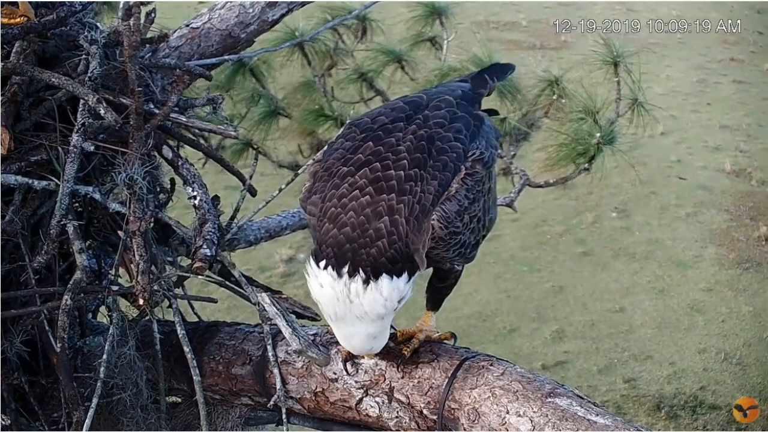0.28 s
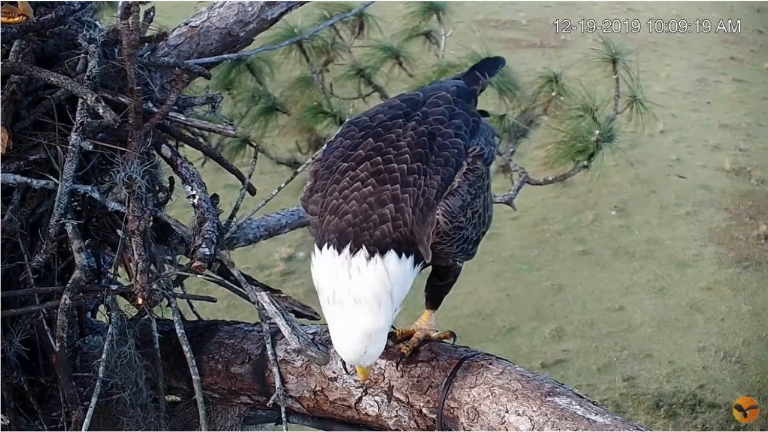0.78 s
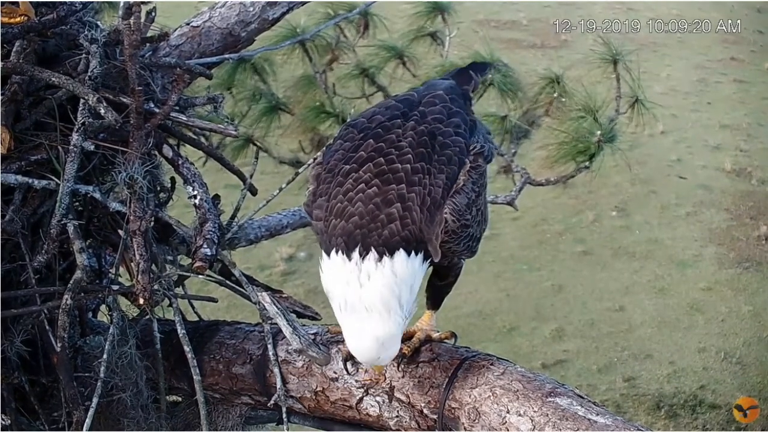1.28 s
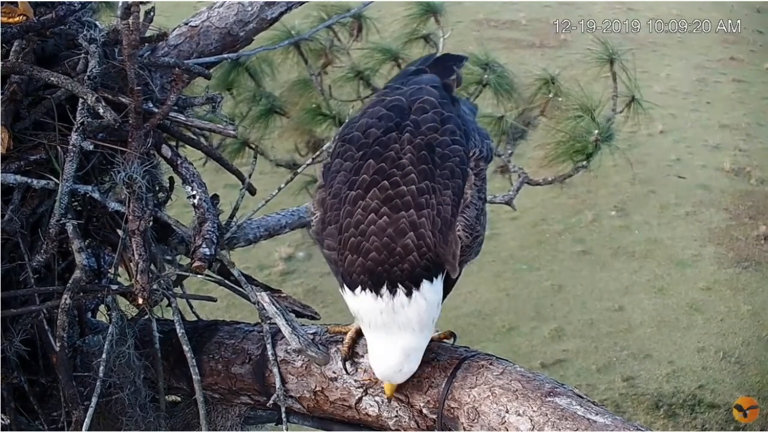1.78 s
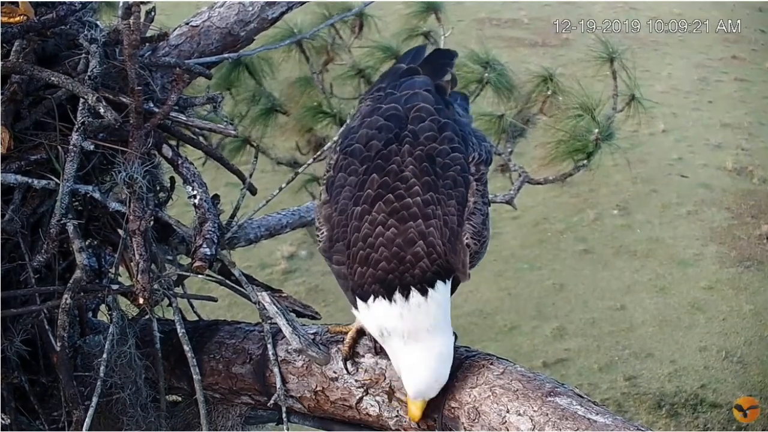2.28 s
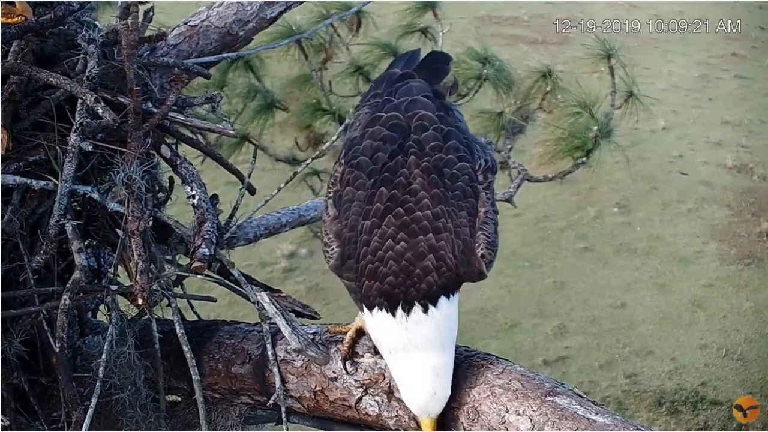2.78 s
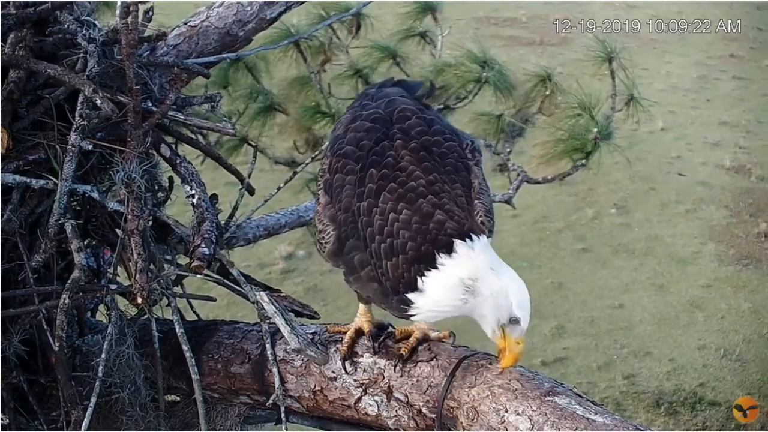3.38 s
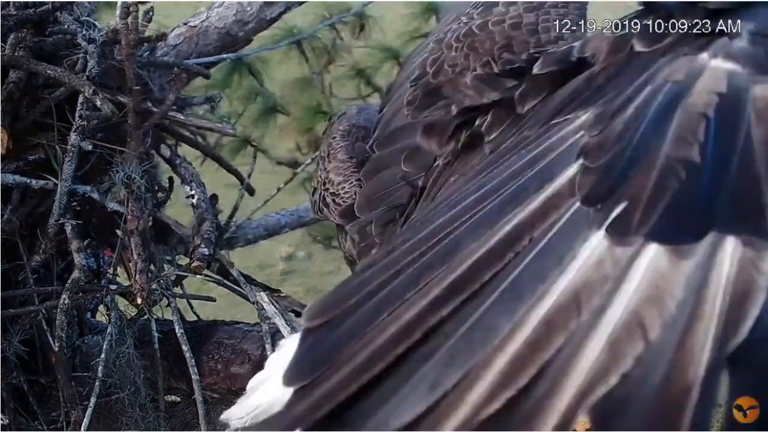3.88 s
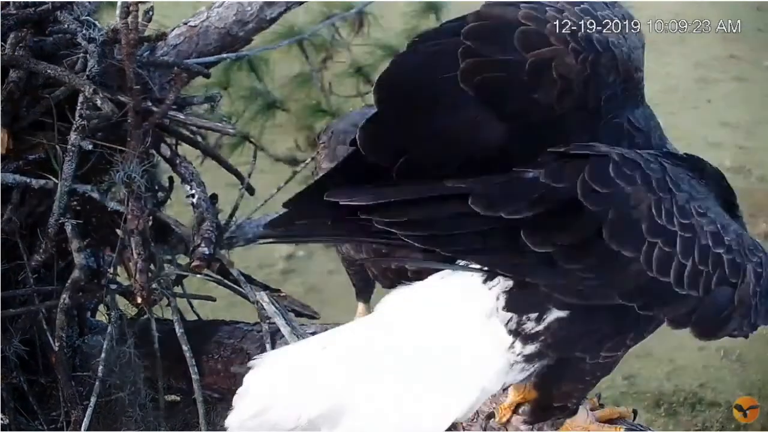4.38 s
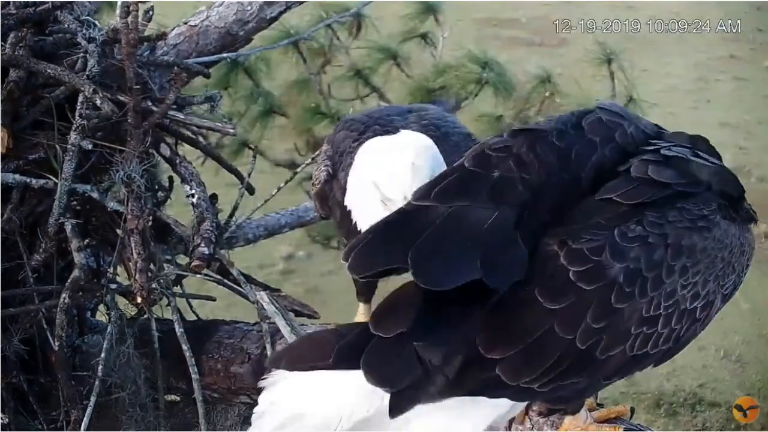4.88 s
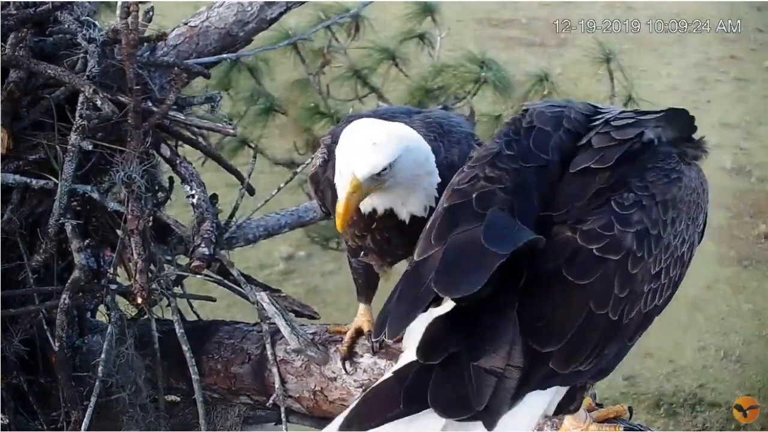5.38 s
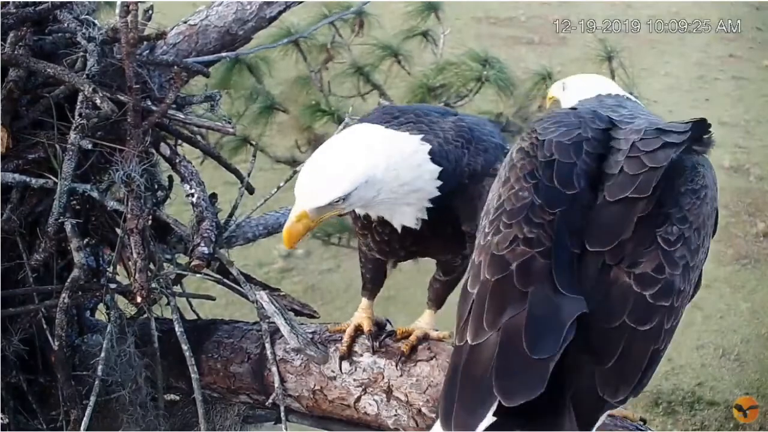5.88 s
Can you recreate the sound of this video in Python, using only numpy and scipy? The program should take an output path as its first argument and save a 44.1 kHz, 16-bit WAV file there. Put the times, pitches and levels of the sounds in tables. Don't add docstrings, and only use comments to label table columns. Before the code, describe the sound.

Throughout, gusting low wind rumble, a muffled hum of far tyres and thin hiss lie under two eagles at a nest, heard close, nearly mono. Faint peeps and ticks come at 0.2-0.3 s. At 0.9 s a clear high whistle bends up and falls, with a weaker rising end until 1.06. Around 1.53-1.65 a broken lower waver becomes a strong rising cry. A high wavering whistle follows at 2.3-2.5, then a loud, piercing low waver at 3.06-3.23. Two very short cries jab at 3.56 and 3.69, the second jittery. Small peeps and claw or twig ticks fill the pause. The mate gives a low chirp and chuck at 4.7, quick chitters at 5.12-5.27, a chuck at 5.68 and more chirps from 5.8. High whistles arch and rise over these from 5.87 to 6.04; a faint chuck ends near 6.13. Trees return a short echo.

```python
import sys
import numpy as np
from scipy import signal
from scipy.io import wavfile
from scipy.ndimage import uniform_filter1d

SR = 44100
rng = np.random.default_rng(int(sys.argv[2]) if len(sys.argv) > 2 else 0)


def store_wav(level_fs):
    pcm = np.round(np.clip(np.atleast_2d(level_fs), -1, 1) * 32767)
    wavfile.write(sys.argv[1], SR, pcm.T.astype(np.int16))


def ratio_of_db(decibels):
    return 10 ** (np.asarray(decibels, float) / 20)


N = 272097


def eagles():
    return low_whistles() + high_whistles() + mate_chirps() + peeps()


def low_whistles():
    # [start_s, pitch_hz, effort_db]
    wavers = [
        [(1.527, 2630, -46), (1.535, 2557, -32.5), (1.551, 2752, -23), (1.565, 2758, -23), (1.573, 2872, -40),
         (1.585, 2940, -32), (1.591, 2675, -39.5), (1.598, 2655, -36)],
        [(1.593, 2650, -40.5), (1.611, 2770, -12), (1.633, 2843, -11.5), (1.648, 2925, -29)],
    ]
    # [start_s, pitch_hz, effort_db]
    long_waver = [
        [(3.057, 2900, -39.5), (3.066, 2685, -16), (3.074, 2770, -10), (3.088, 2790, -11), (3.1, 2864, -9),
         (3.118, 2850, -10), (3.138, 2740, -10), (3.15, 2727, -11.5)],
        [(3.1455, 2714, -12.5), (3.16, 2743, -11), (3.172, 2785, -8.5), (3.187, 2890, -9.5), (3.205, 2890, -9),
         (3.216, 2846, -10), (3.225, 2890, -29.5)],
    ]
    # [start_s, pitch_hz, effort_db]
    short_cries = [
        [(3.557, 2750, -41), (3.568, 2837, -25.5), (3.578, 2893, -22.5), (3.583, 2958, -12), (3.592, 2927, -12),
         (3.6, 2940, -26)],
        [(3.685, 2760, -41), (3.691, 2755, -20), (3.694, 2680, -12), (3.698, 2660, -20), (3.703, 2870, -12),
         (3.71, 2802, -12.5), (3.717, 2730, -35)],
    ]
    # [start_s, length_s, level_db]
    high_breaks = [
        (1.583, 0.043, -43.5),
        (3.055, .02, -43),
        (3.559, 0.043, -44.5),
        (3.68, 0.019, -44),
    ]
    return whistles(wavers + long_waver + short_cries, high_breaks,
                    overtone_db=-7.0, growth=2.01, strong=2.993,
                    partials_db={2: -20.0, 4: -12.0, 5: -25.0}, squared_db=-19,
                    other_hz=3570, width_hz=500, flutter_db=-27.0, knee=0.33, ceiling=0.57)


def high_whistles():
    # [start_s, pitch_hz, effort_db]
    calls = [
        [(0.9, 3670, -38), (0.906, 3446, -34), (0.918, 3576, -24), (0.934, 3690, -17.5), (0.966, 3645, -18.5),
         (1.002, 3452, -42)],
        [(0.997, 3524, -45), (1.009, 3584, -28), (1.031, 3610, -22), (1.058, 3690, -35)],
        [(2.324, 3710, -50), (2.334, 3622, -21.5), (2.35, 3704, -16.5), (2.406, 3574, -22.5),
         (2.444, 3693, -17), (2.462, 3730, -17), (2.476, 3654, -28.5)],
        [(5.874, 3406, -42.5), (5.884, 3450, -21.5), (5.906, 3557, -16), (5.924, 3598, -17.5),
         (5.944, 3525, -19.5), (5.962, 3355, -35)],
        [(5.957, 3384, -36.5), (5.977, 3377, -26.5), (6.017, 3588, -19.5), (6.027, 3550, -21.5),
         (6.044, 3620, -48.5)],
    ]
    # [start_s, length_s, level_db]
    low_breaks = [
        (.905, 0.025, -42),
        (.93, 0.076, -38),
        (1.02, .035, -38),
        (2.34, .14, -42.5),
        (5.9, 0.11, -57),
        (6.015, 0.015, -34.5),
    ]
    return whistles(calls, low_breaks,
                    overtone_db=-2.5, growth=2.5, strong=2.001, partials_db={3: -36.0}, squared_db=-28.0,
                    other_hz=2880, width_hz=120, flutter_db=-36.0, knee=0.01, ceiling=0.6)


def whistles(tables, breaks, overtone_db, growth, strong, partials_db, squared_db,
             other_hz, width_hz, flutter_db, knee, ceiling):
    phase, (effort,) = controls(tables, tremble_share=0.002)
    strike = 1 + (knee / (effort + 1e-9)) ** 14
    overtone = ratio_of_db(overtone_db) * effort ** growth / strike
    lead = effort / (1 + (effort / ceiling) ** 4) ** (1 / 4)
    out = lead * np.sin(phase) + overtone * np.sin(strong * phase)
    for k, db in partials_db.items():
        out += ratio_of_db(db) * overtone * np.sin(k * phase)
    out += ratio_of_db(squared_db) * lead ** 2 * np.sin(2 * phase)
    other = swells(breaks) * unsteady(other_hz, width_hz)
    mixed = other ** 2 + other * lead * np.exp(1j * phase)
    out += other.real + 0.39 * mixed.real / 2
    air = ratio_of_db(-43.0) * overtone * unsteady(8000, 6000).real
    flutter = ratio_of_db(flutter_db) * overtone * unsteady(1000, 520).real
    return out + air + flutter * np.sin(2 * phase)


def mate_chirps():
    # [start_s, length_s, pitch_hz, level_db, pitch_fall_share]
    bright = [
        (4.694, 0.017, 1723, -37, 0.05),
        (5.116, .021, 1904, -29, 0.02),
        (5.129, 0.025, 1983, -28, 0.05),
        (5.148, 0.021, 1914, -30.5, 0.03),
        (5.237, 0.015, 1863, -31.5, 0),
        (5.251, 0.016, 1880, -32, 0.05),
        (5.798, 0.019, 1948, -32, .07),
        (5.815, 0.018, 2039, -32, 0.11),
        (5.997, .02, 1925, -34, 0.07),
    ]
    # [start_s, length_s, pitch_hz, level_db, pitch_fall_share]
    chucks = [
        (4.707, .037, 1307, -35, .13),
        (5.682, 0.036, 1306, -37.5, .06),
        (6.018, 0.0073, 1215, -33, 0.0475),
        (6.12, 0.014, 1278, -40, 0.146),
    ]
    bright_rows = [syllable(*row, second_db=0.71, third_db=15.2, growth=2.15, shut_db=-14) for row in bright]
    chuck_rows = [syllable(*row, second_db=-2.5, third_db=-2.5, growth=1.09, shut_db=-5.5) for row in chucks]
    out = chirps(bright_rows, fourth_db=-12.5, rasp_db=-19.5)
    return out + chirps(chuck_rows, fourth_db=-29.0, rasp_db=-10.5)


def syllable(s, length, hz, db, fall, second_db, third_db, growth, shut_db):
    crest = np.array([db, db + second_db, growth * db + third_db])
    ends = crest - 7 + np.array([0, 1, 1.5]) * shut_db
    return [
        (s, hz * (1 - 0.015), *ends),
        (s + 0.35 * length, hz, *crest),
        (s + 0.7 * length, hz * (1 - fall / 2), *(crest - 2.5)),
        (s + length, hz * (1 - fall), *ends),
    ]


def chirps(tables, fourth_db, rasp_db):
    phase, partials = controls(tables, tremble_share=0.0044)
    stack = sum(level * np.sin((k + 1) * phase) for k, level in enumerate(partials))
    fourth = ratio_of_db(fourth_db) * partials[2] * np.sin(4 * phase)
    rasp = partials[1] * unsteady(2600, 1485).real * (1 + np.cos(phase))
    return stack + fourth + ratio_of_db(rasp_db) * rasp


def peeps():
    # [start_s, length_s, pitch_hz, level_db]
    short_tones = [(0.2, 0.014, 4030, -46), (0.289, .013, 4350, -50), (0.296, 0.025, 2850, -38.5),
                   (.921, 0.014, 2838, -17), (0.987, .02, 5900, -57.5), (.922, 0.0139, 5680, -53),
                   (1.014, 0.015, 5500, -57.5), (1.711, 0.019, 4150, -43.5), (2.297, 0.015, 2080, -41),
                   (2.316, 0.041, 2830, -25), (2.328, 0.037, 4410, -50.5), (2.397, 0.035, 4445, -58),
                   (3.165, 0.0063, 3130, -25), (3.562, .021, 7670, -47), (4.211, 0.024, 3460, -43),
                   (4.22, 0.022, 2880, -31.5), (4.231, 0.011, 7600, -60), (4.771, 0.0079, 7470, -58),
                   (5.048, 0.012, 7350, -59), (5.356, 0.02, 3380, -34), (5.357, 0.019, 4270, -50),
                   (5.78, 0.0094, 2472, -39), (5.814, 0.017, 3320, -31.5), (5.827, .025, 7540, -68.5),
                   (6, 0.011, 3144, -38), (6.137, 0.023, 3680, -58)]
    out = np.zeros(N)
    for s, length, hz, db in short_tones:
        t = np.arange(0, length, 1 / SR)
        shake = evened(signal.oaconvolve(rng.standard_normal(len(t)), np.hanning(300), "same"))
        tone = np.sin(2 * np.pi * hz * t * (1 - 0.12 * t))
        add(out, s, ratio_of_db(db) * (1 + 0.25 * shake) * np.hanning(len(t)) * tone)
    return out


def controls(tables, tremble_share):
    rows, t = np.concatenate(tables), np.arange(N) / SR
    s, hz = rows[np.argsort(rows[:, 0]), :2].T
    tremble = evened(uniform_filter1d(rng.standard_normal(N), size=120))
    pitch = uniform_filter1d(np.interp(t, s, hz), size=200)
    phase = 2 * np.pi * np.cumsum(pitch * (1 + tremble_share * tremble)) / SR
    levels = np.zeros((rows.shape[1] - 2, N))
    for table in tables:
        s, _, *columns = np.transpose(table)
        span = np.arange(s[0], s[-1], 1 / SR)
        edge = signal.windows.tukey(len(span), min(1, 0.009 * SR / len(span)))
        for level, db in zip(levels, columns):
            add(level, s[0], np.sqrt(2) * edge * ratio_of_db(np.interp(span, s, db)))
    return phase, abs(uniform_filter1d(levels, size=60, axis=1))


def swells(rows):
    out = np.zeros(N)
    for s, length, db in rows:
        add(out, s, np.sqrt(2) * ratio_of_db(db) * signal.windows.tukey(round(length * SR), 0.7))
    return out


def unsteady(hz, width_hz):
    r = np.exp(-np.pi * width_hz / SR)
    noise = rng.standard_normal((N, 2)) @ [1, 1j]
    wander = signal.lfilter([1], [1, -2 * r, r * r], noise)
    return evened(wander) * np.exp(2j * np.pi * hz * np.arange(N) / SR)


def ticks():
    # [peak_s, level_db, centre_hz, half_width_hz, decay_ms]
    crackles = [(.181, -57, 6000, 3500, 3), (0.184, -43, 3160, 700, 60), (0.284, -45, 3340, 700, 23),
                (1.073, -56, 10000, 5000, 1.5), (1.583, -44, 4050, 400, 21), (1.609, -45, 9100, 6030, 5.3),
                (3.522, -48, 9000, 6000, 1.5), (3.526, -52, 9000, 4956, 1.75),
                (3.573, -54.5, 10460, 2480, 3.1), (3.601, -58, 9000, 5007, 3),
                (3.692, -44, 8950, 6040, 2.7), (4.282, -50, 10100, 3000, 2.93),
                (4.412, -58, 7540, 3010, 1.4), (4.689, -49, 3970, 2490, 1.5),
                (5.82, -43.5, 3000, 1190, 5.26), (6.002, -45, 2994, 1176, 7.5),
                (6.122, -45, 2820, 1500, 6.5)]
    out, t = np.zeros(N), np.arange(4000) / SR
    for s, db, hz, width_hz, ms in crackles:
        band = signal.butter(3, [max(hz - width_hz, 300), min(hz + width_hz, 16000)], "band", fs=SR)
        noise = evened(signal.lfilter(*band, rng.standard_normal(len(t))))
        envelope = np.exp(-1000 * t / ms) * np.minimum(4000 * t / ms, 1)
        add(out, s - 0.001, ratio_of_db(db) * noise * envelope)
    return out


def trees(x):
    taps = np.zeros((2, SR // 2))
    slots = np.arange(200, SR // 2 - 22, 22)
    at = slots + rng.integers(0, 22, (2, len(slots)))
    np.put_along_axis(taps, at, rng.choice([-1., 1.], at.shape), 1)
    taps[1] = 0.63 * taps[0] + 1.07 * taps[1]
    hz, t, z = signal.stft(taps, SR, nperseg=256)
    t60 = read([(2000, 0.29), (2800, 0.39), (3600, 0.5), (8500, 0.39), (12000, 0.25)], hz)[:, None]
    dull_db = read([(2000, 8.5), (2800, -5.0), (3600, -3.0), (8500, -4.0), (11000, -13.5),
                    (14000, -18.0)], hz)[:, None]
    trunk_db = 4.3 * np.exp(-((t - 0.09) / 0.0097) ** 2)
    field_db = -280 * np.minimum(hz[:, None] / 8000, 1.2) ** 2 * np.clip(t - 0.105, 0, 0.06)
    tail = signal.istft(z * ratio_of_db(dull_db + trunk_db + field_db - 60 * t / t60), SR, nperseg=256)[1]
    return signal.fftconvolve(x[None], tail / np.linalg.norm(tail[0]), axes=1)[:, :N]


def background():
    # [pitch_hz, density_db]
    wind = [(16, -30.5), (28, -1.5), (43, 3.5), (63, 1.5), (88, -6), (200, -28), (300, -36), (390, -64.5),
            (660, -120)]
    tyres = [(120, -50), (200, -19), (237, -22.5), (344, -15.5), (479, -13.5), (529, -13.5), (694, -8),
             (752, -7), (815, -2.5), (986, 0), (1250, -13), (1950, -25), (2200, -31), (2860, -60.5),
             (4840, -120)]
    hiss = [(1060, -36.5), (1800, -11), (2300, -7), (2550, -13.5), (2760, -4), (2900, -4), (3130, -7.5),
            (3950, -9), (4480, -17.5), (6000, -36), (7800, -57), (13200, -120)]
    self_noise = [(2940, -27), (5000, -5), (6000, -5), (8380, -6.5), (10500, -9.5), (12200, -13),
                  (13400, -12.5), (14200, -21), (14500, -24)]
    # [time_s, level_db]
    gusts = [(0.0, -36.5), (0.38, -33.5), (0.63, -37), (1.27, -31.5), (1.61, -33), (1.87, -33), (2.25, -40),
             (2.82, -42.5), (3.09, -38.5), (3.27, -39.5), (3.64, -33.5), (3.85, -40.5), (4.04, -38),
             (4.81, -35.5), (5.09, -37.5), (6.17, -33)]
    # [time_s, level_db]
    traffic = [
        (0.0, -44),
        (0.31, -42),
        (1.84, -43),
        (3.33, -46),
        (3.68, -44),
        (4.95, -42.5),
        (5.55, -44),
        (6.17, -41.5),
    ]
    t = np.arange(N) / SR
    wind_db = np.interp(t, *np.transpose(gusts))
    tyres_db = np.interp(t, *np.transpose(traffic))
    hiss_db = 0.47 * (wind_db - wind_db.mean()) + 0.71 * (tyres_db - tyres_db.mean())
    out = airborne(wind, wind_db, 2.5, size=8192)
    out += airborne(tyres, tyres_db, 1.15)
    out += airborne(hiss, hiss_db, -54.0, lifted=0.87)
    return out + airborne(self_noise, 0, -73)


def airborne(shape, level_db, trim_db, lifted=0, size=2048):
    # [centre_hz, width_hz, lift_db]
    housing = (2850, 160, 5.6)
    # [pitch_hz, side_minus_mid_db]
    apart = [(60, -75.5), (110, -65), (200, -49), (380, -21), (690, -17), (1280, -18.5), (2350, -28),
             (4330, -25.5), (7990, -18), (14700, -7.5)]
    frames, hz = 4 * N // size + 5, np.fft.rfftfreq(size, 1 / SR)
    centre_hz, width_hz, lift_db = housing
    cavity_db = lift_db / (1 + (2 * (hz - centre_hz) / width_hz) ** 2)
    shape_db = read(shape, hz) + lifted * cavity_db
    a, b, c, d, patches = rng.standard_normal((frames, len(hz), 5)).T
    patches = uniform_filter1d(patches, size=20, axis=0)
    patches = evened(uniform_filter1d(patches, size=6, axis=1))
    mid = a + 1j * b
    side = (c + 1j * d) * ratio_of_db(read(apart, hz))[:, None]
    z = np.array([mid + side, mid - side]) * ratio_of_db(shape_db[:, None] + 1.3 * patches)
    layer = evened(signal.istft(z, nperseg=size, noverlap=3 * size // 4)[1][:, :N])
    return layer * ratio_of_db(level_db + trim_db)


def evened(x):
    return x / np.sqrt(np.mean(abs(x) ** 2) + 1e-20)


def read(points, hz):
    f, value = np.transpose(points)
    return np.interp(np.log(hz + 1), np.log(f + 1), value)


def add(mix, s, sound):
    part = mix[round(s * SR):][:len(sound)]
    part += sound[:len(part)]


def scene():
    near = eagles() + ticks()
    direct = near * ratio_of_db([[0.1], [-0.1]])
    return direct + ratio_of_db(-16.0) * trees(near) + background()


def roll_off(x):
    return signal.sosfilt(signal.butter(12, 15320, fs=SR, output="sos"), x)


def record(dry):
    # [pitch_hz, reach_half_db]
    reach = [(3900, -170), (4400, -94), (5200, -104), (6000, -126), (8500, -126), (11000, -150)]
    hz, _, z = signal.stft(dry, SR, nperseg=512)
    power = uniform_filter1d((abs(z) ** 2).mean(0), size=5, axis=0) + 1e-20
    mask = ratio_of_db(read(reach, hz))[:, None] * power[hz > 2000].max(0)
    thinned = signal.istft(z / (1 + (mask / power) ** 2), SR, nperseg=512)[1][:, :N]
    edge = signal.firwin(511, 14050, window=("kaiser", 6), fs=SR)[None]
    return roll_off(signal.oaconvolve(thinned, edge, "same"))


dry = scene()
out = record(dry)
store_wav(out)
```